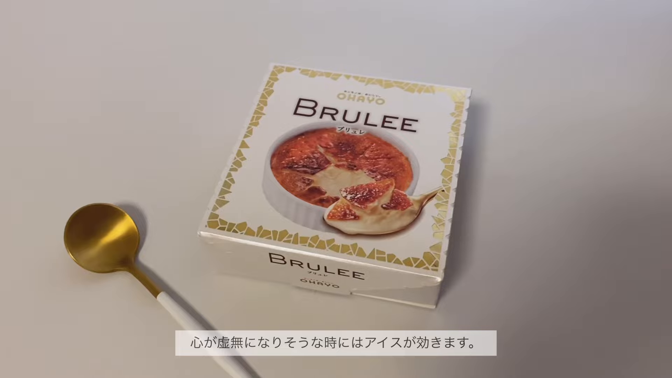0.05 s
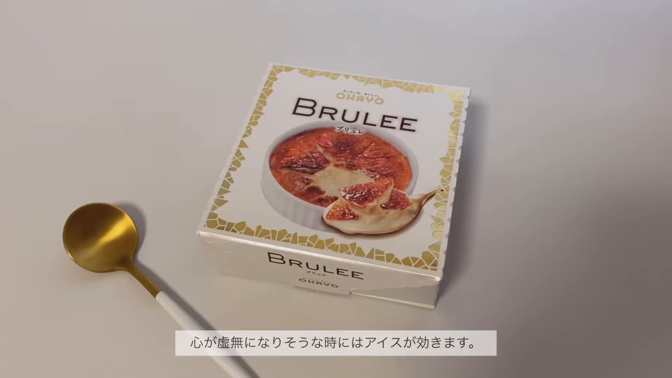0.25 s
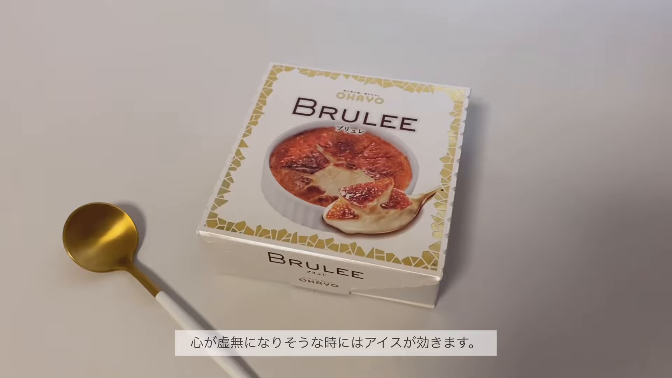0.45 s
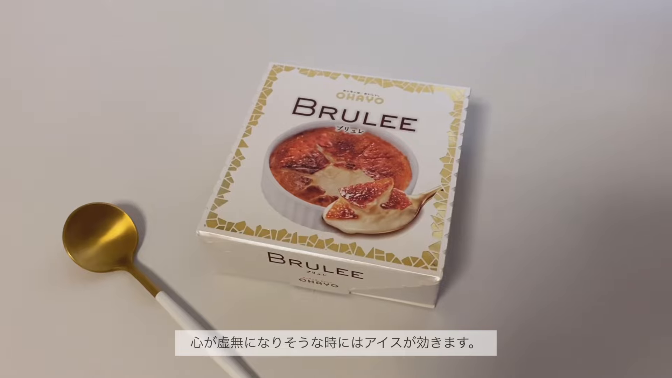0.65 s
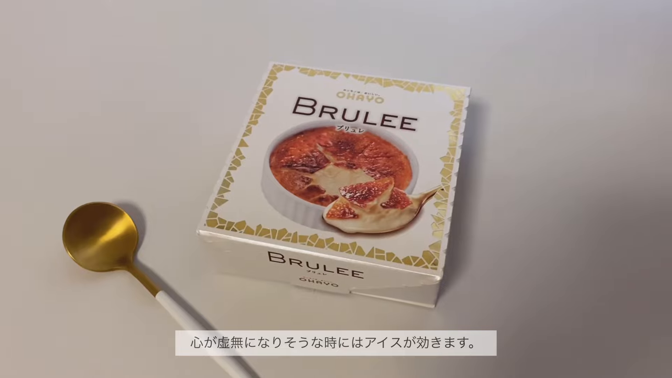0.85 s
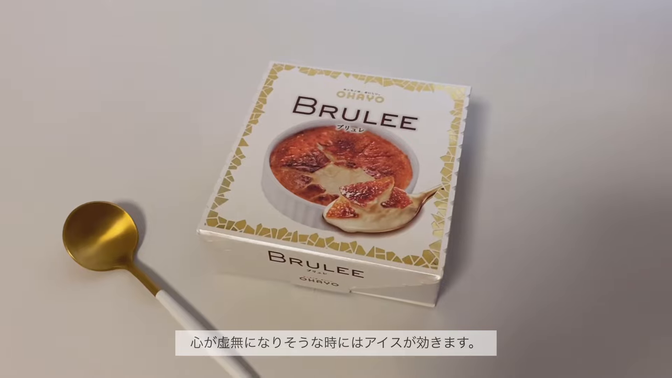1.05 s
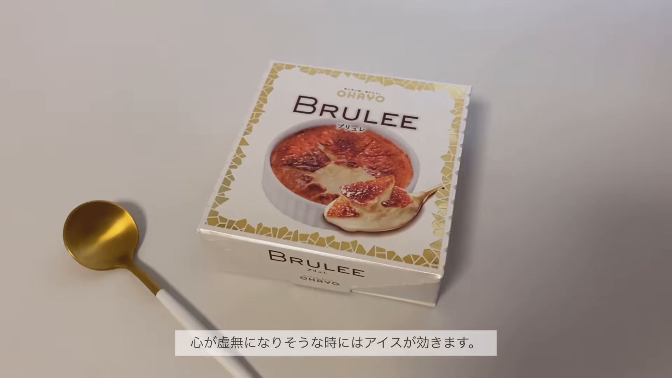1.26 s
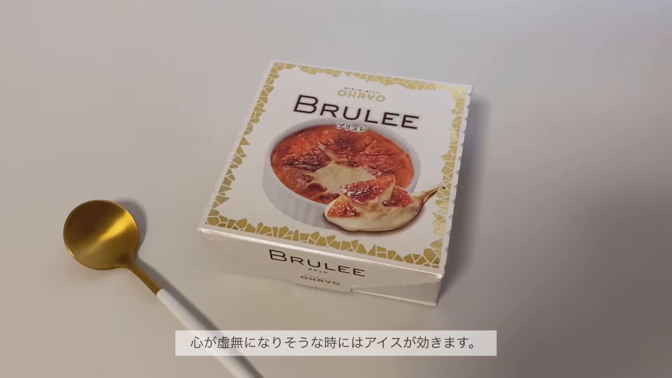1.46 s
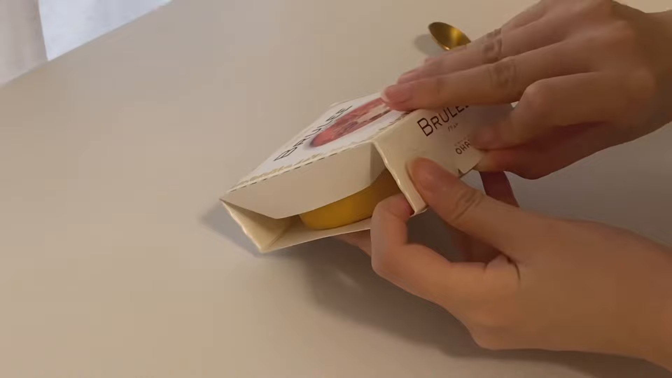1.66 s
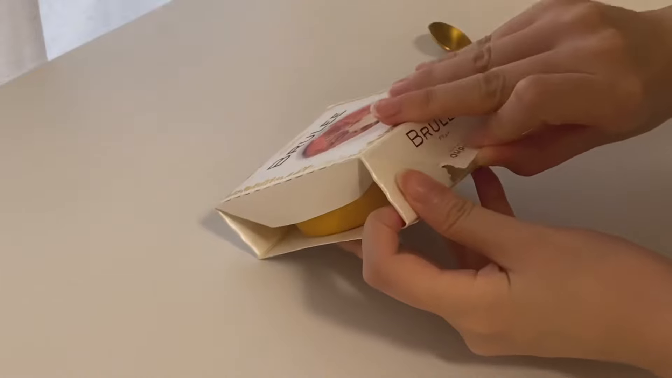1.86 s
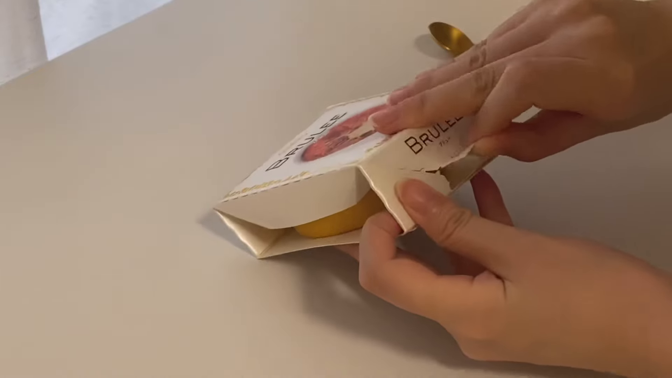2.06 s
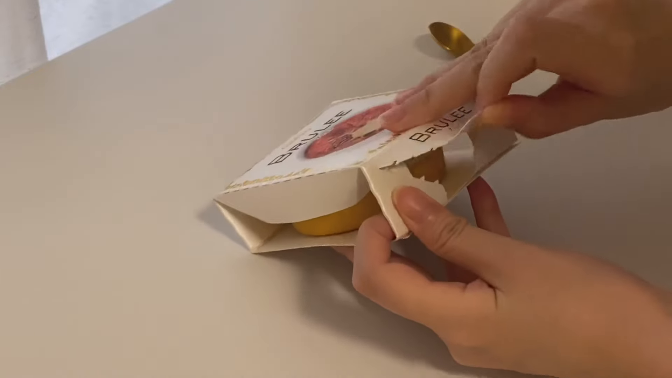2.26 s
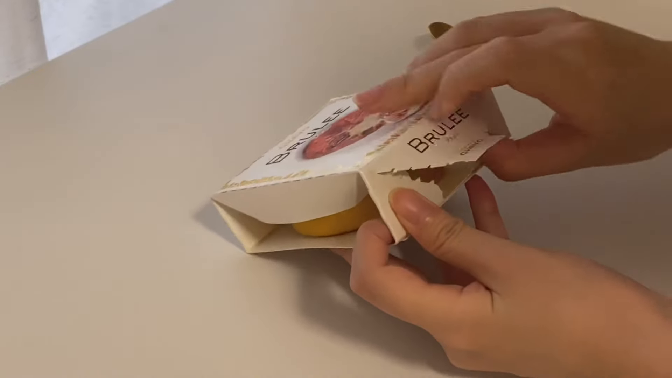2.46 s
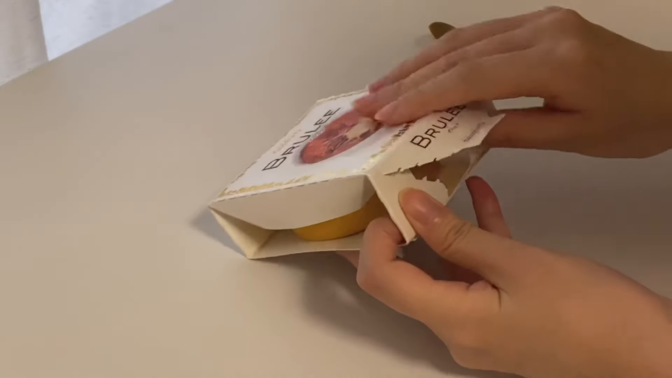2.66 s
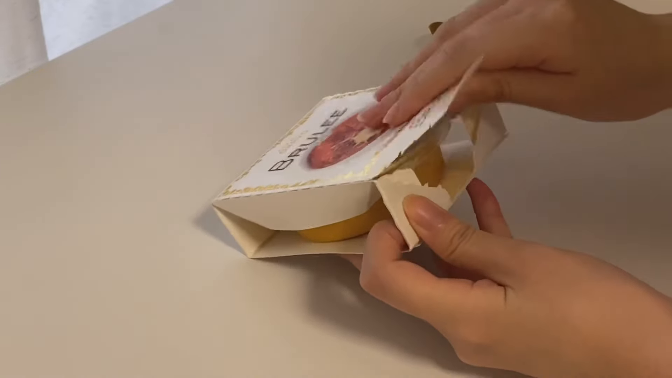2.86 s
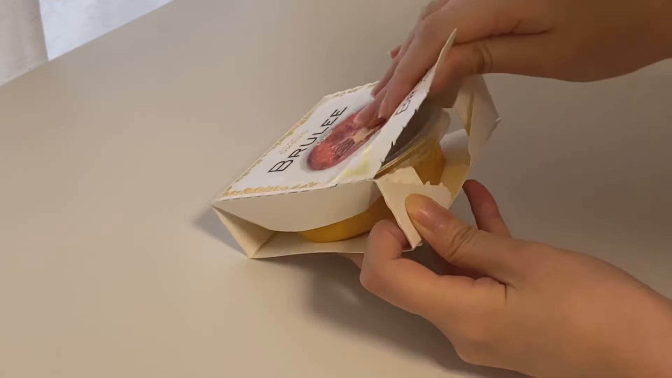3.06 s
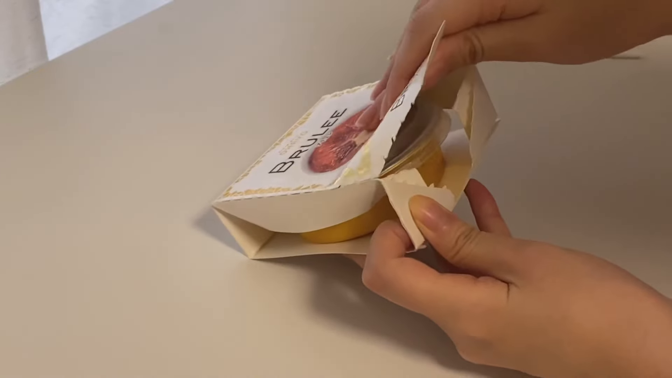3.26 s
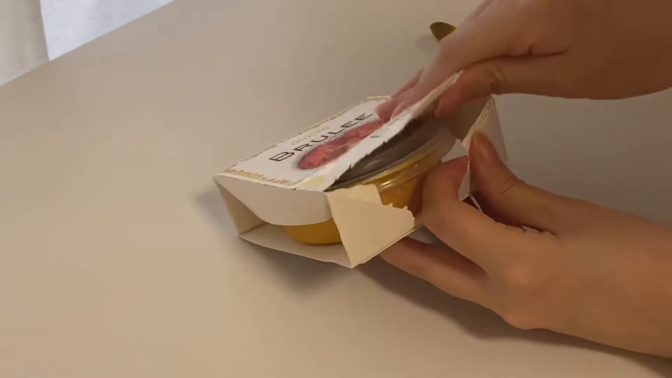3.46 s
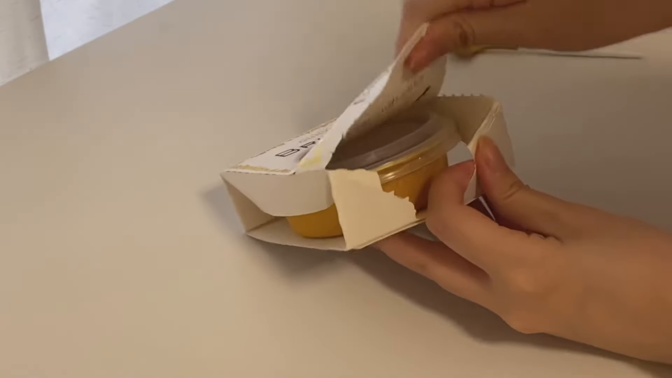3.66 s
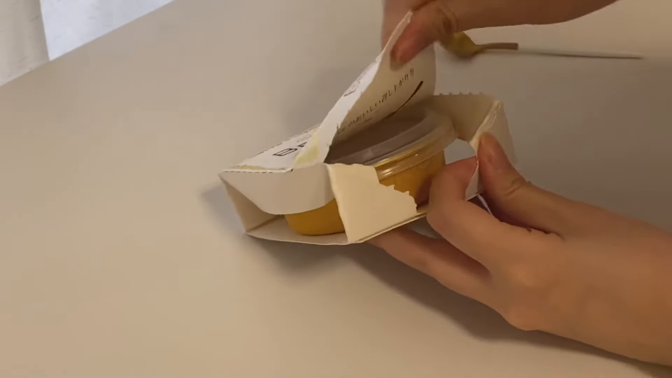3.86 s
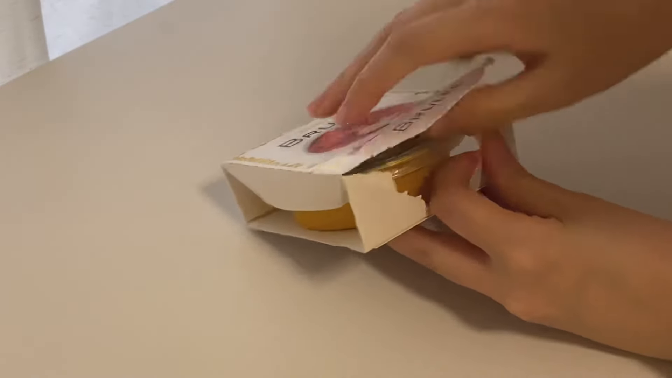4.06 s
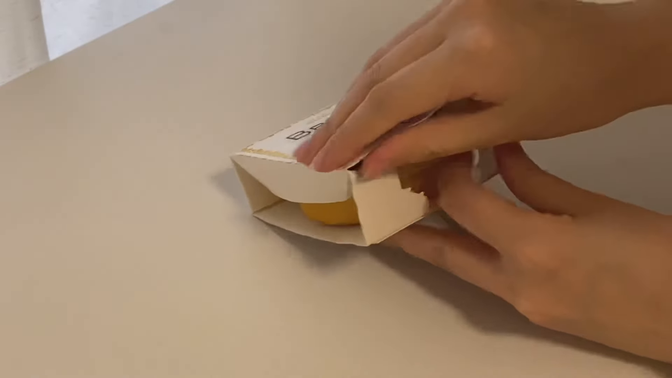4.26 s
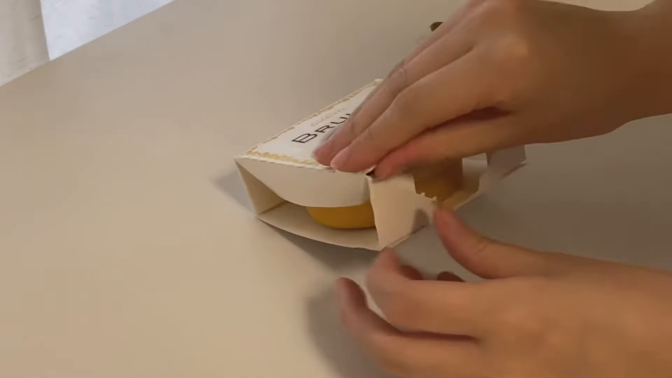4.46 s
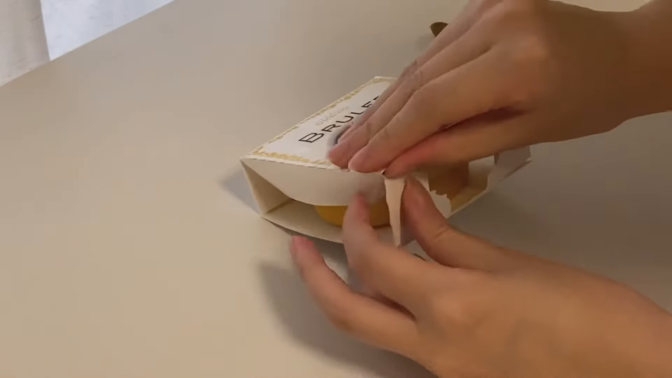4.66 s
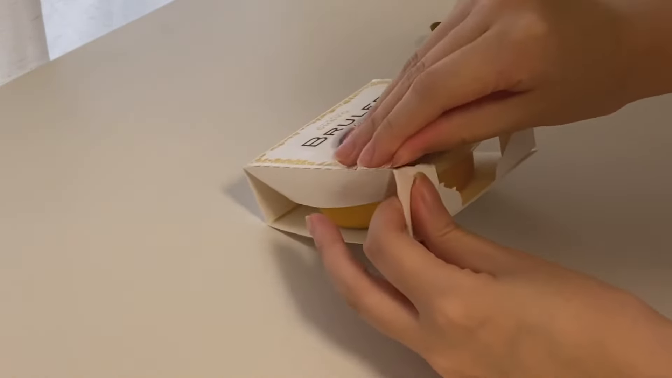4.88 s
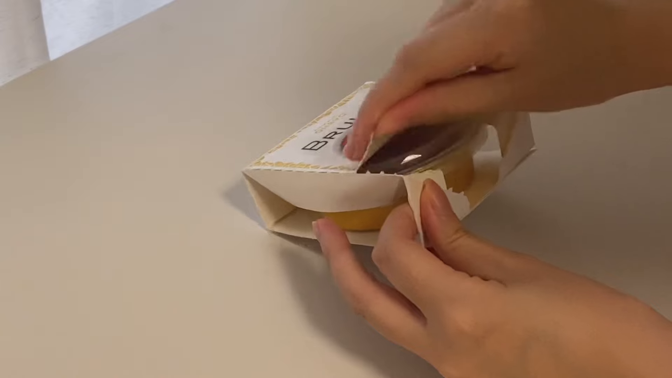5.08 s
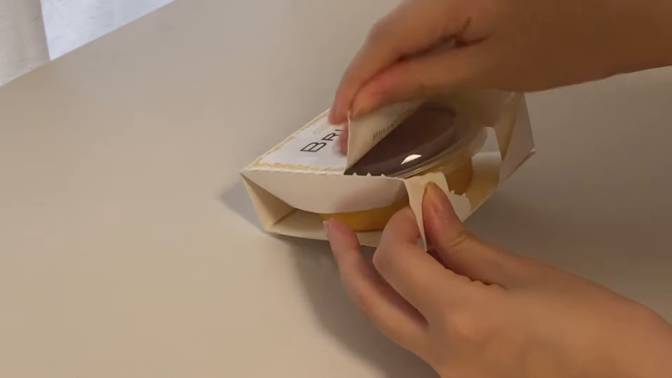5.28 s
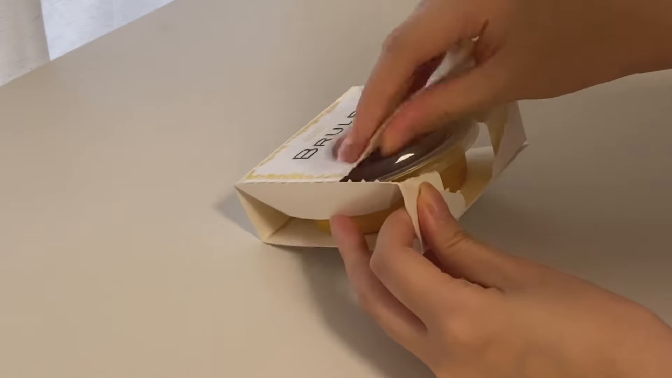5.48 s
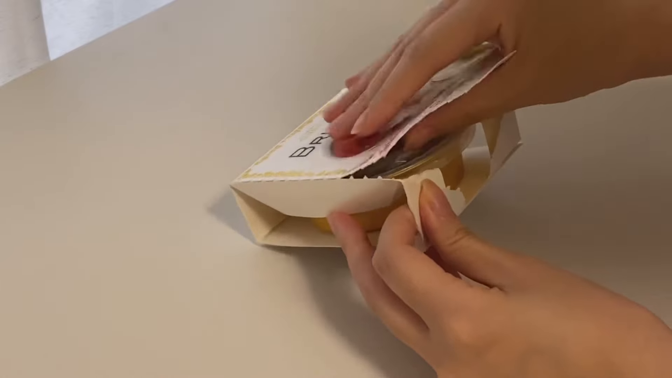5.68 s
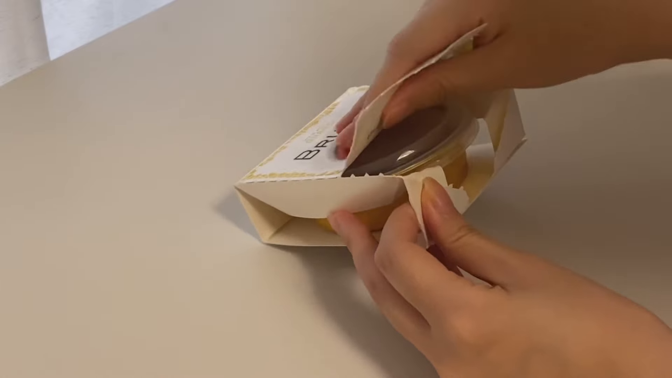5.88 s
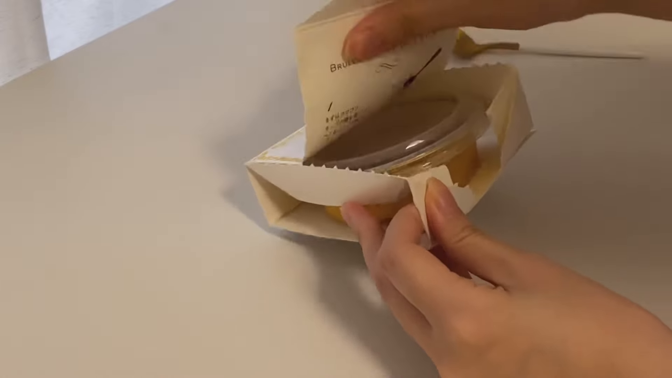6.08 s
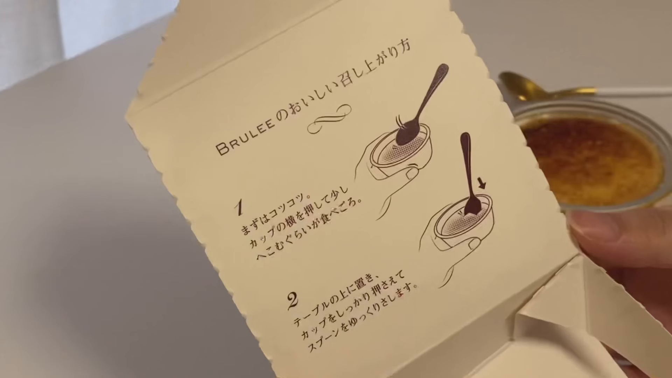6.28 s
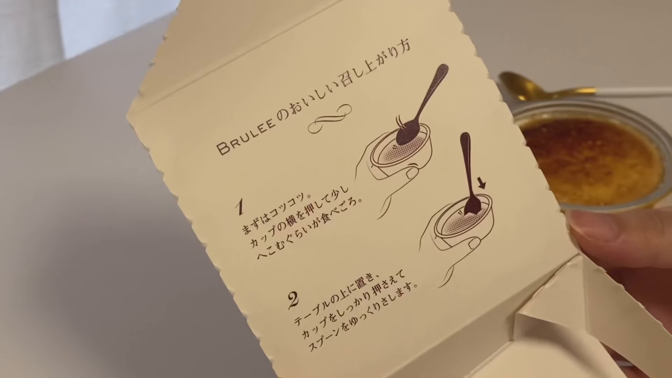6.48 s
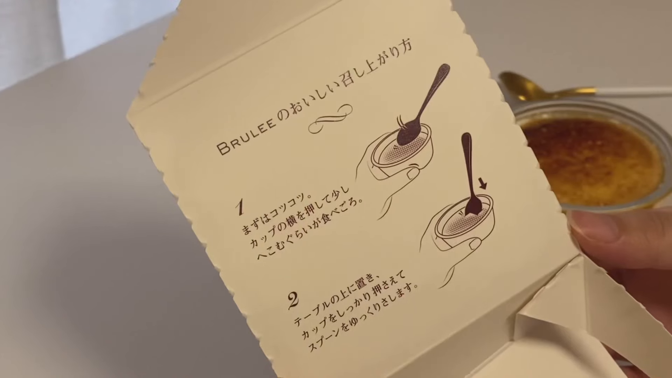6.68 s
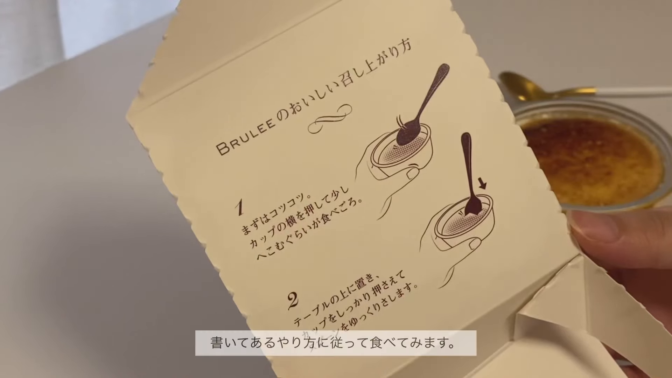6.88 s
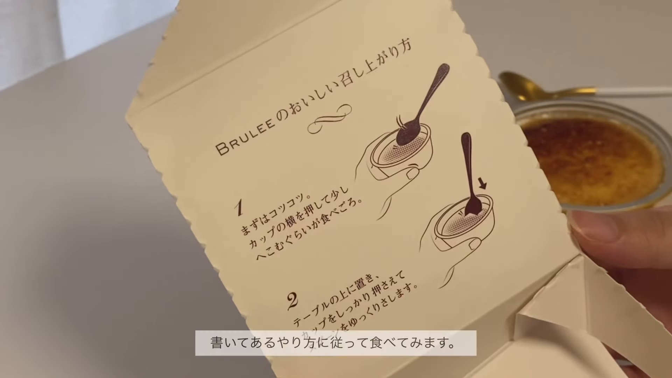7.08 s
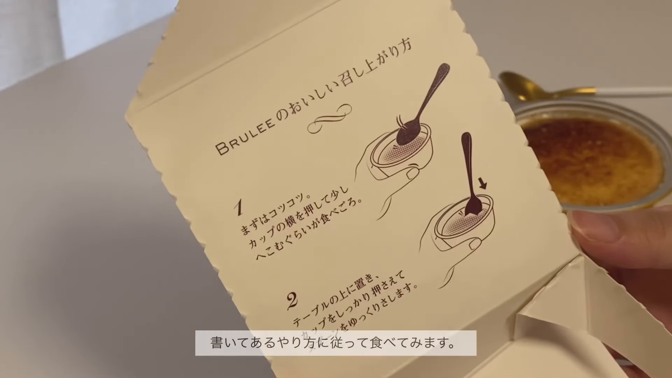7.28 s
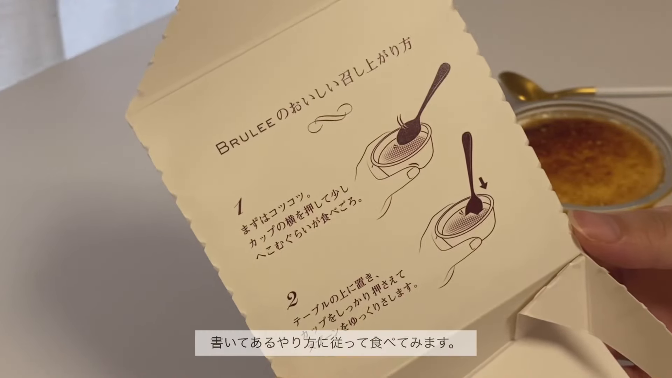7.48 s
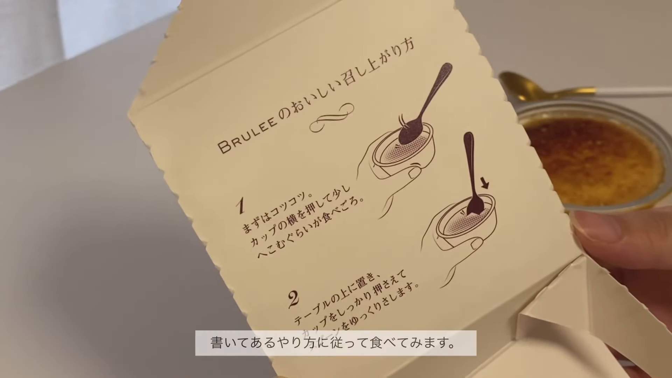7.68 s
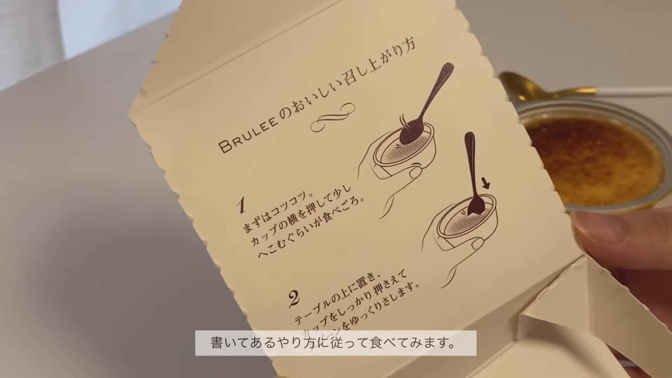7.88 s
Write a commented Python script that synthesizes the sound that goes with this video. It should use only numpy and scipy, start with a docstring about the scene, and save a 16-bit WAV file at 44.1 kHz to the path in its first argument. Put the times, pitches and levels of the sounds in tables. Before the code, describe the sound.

After a moment of quiet room air with a very faint appliance whine, hands tear a small paperboard box open along its perforation. The paper bridges give way in irregular clusters of dry snaps, some with a light hollow knock from the box. Fingers rub and slide softly on the board between tears. A last crackling burst leaves only quiet air. The microphone is close, at a table indoors.

```python
"""Quiet room air with a thin appliance whine. From 1.72 s hands tear a small paperboard box open
along its perforation, close by on a table. Each paper bridge creaks, snaps and rings the board,
the air inside and the table top. Fingers rub the board between tears over a low handling rumble;
the room answers briefly. From 6.22 s only quiet air of another colour is heard."""
import sys
import numpy as np
from scipy import signal
from scipy.fft import rfft, irfft, next_fast_len
from scipy.io import wavfile
from scipy.ndimage import uniform_filter1d

SR = 44100
rng = np.random.default_rng(int(sys.argv[2]) if len(sys.argv) > 2 else 0)


def int16_out(signal):
    """Quantize to a 16-bit WAV file."""
    q = np.round(np.clip(np.atleast_2d(signal).T, -1, 1) * 32767)
    wavfile.write(sys.argv[1], SR, q.astype(np.int16))


N = 350021
START_S, END_S = 1.72, 6.22  # box in hand
# hiss of skin and straining fibres: f/Hz, density/dB
HISS = [(1200, -25), (2000, -8.5), (3200, -10), (5000, -17), (7500, -16), (9500, -23.5), (15300, -24.5),
        (16000, -48.5)]


def gain_of(db):
    """Decibels to amplitude."""
    return 10 ** (np.asarray(db) / 20)


def unit_rms(x):
    """Scales x to rms 1."""
    return x / np.sqrt(np.mean(x ** 2) + 1e-20)


def lookup(points, hz):
    """Interpolates a table over log frequency."""
    f, value = np.transpose(points)
    return np.interp(np.log(hz + 1), np.log(f + 1), value)


def colour(x, points):
    """Filters x by a table of f/Hz, gain/dB."""
    size = next_fast_len(x.shape[-1])
    gain = gain_of(lookup(points, np.fft.rfftfreq(size, 1 / SR)))
    return irfft(rfft(x, size) * gain, size)[..., :x.shape[-1]]


def wander(rows, span_samples):
    """Smooth random curves, rms 1."""
    noise = rng.standard_normal((rows, N))
    return unit_rms(uniform_filter1d(uniform_filter1d(noise, span_samples), span_samples))


def add(mix, start_s, sound):
    """Adds sound to mix at start_s."""
    part = mix[round(start_s * SR):][:len(sound)]
    part += sound[:len(part)]


def tearing(strain_s=.012, knock_db_per_db=0.84):
    """Each bridge strains with a fast-growing creak, then snaps; the current grip sets the knock."""
    # bridges and creases: t/s, peak/dB, freed edge f/Hz, wall f/Hz, box ring/dB, fibre treble/dB
    snaps = [(1.844, -5.5, 1710, 1074, -9, -5.5), (1.862, -24, 2100, 1430, -22, -4),
             (1.957, -10.5, 2530, 1440, -15, -18.5), (2.086, -9, 2220, 805, -13, -12),
             (2.108, -7.5, 2840, 1540, -11.5, -7.5), (2.127, -4, 4600, 1590, -9, -11.5),
             (2.132, -10, 2380, 1060, -11, -17.5), (2.231, -11.5, 1670, 950, -11, -15),
             (2.24, -1.5, 2020, 1220, -14, -12), (2.249, -24, 2280, 640, 1, -33.5),
             (2.445, -34.5, 1670, 1130, -2, -14.5), (2.464, -37, 2150, 1100, 18, -17),
             (2.53, -40, 2900, 800, -2, -25.5), (2.625, -25.5, 1860, 980, 2.5, -21),
             (2.701, -7, 2580, 1140, -2, -6.5), (2.795, -15, 1870, 980, -3.5, -15),
             (2.798, -25, 2020, 934, 16, -43), (2.87, -14.5, 2220, 980, 0, -8),
             (2.883, -20.5, 2980, 1100, -3, -4), (2.893, -25.5, 2470, 1330, -8, -11),
             (3.025, -51, 3420, 1210, 2.5, -28.5), (3.215, -52, 1880, 738, -3.5, -33.5),
             (3.406, -25.5, 2080, 1143, -2, -8), (3.41, -31, 2040, 1220, -0.5, -23),
             (3.432, -3, 1920, 1026, -9.5, -20.5), (3.481, -2.5, 2080, 1220, -2.5, -11.5),
             (3.536, -4, 2260, 1210, -5.5, -14.5), (3.59, -8.5, 3120, 1280, 2.5, -5),
             (3.601, -18, 1890, 665, -8, -18), (3.635, -9, 1740, 837, -3, -12.5),
             (3.921, -36.5, 1960, 893, -19.5, -17.5), (3.931, -40.5, 3530, 1176, -6, -20),
             (3.947, -27.5, 2750, 1203, 12.5, 9), (4.047, -37.5, 4100, 1210, 10, 4),
             (4.226, -24.5, 2180, 1080, -12.5, -18), (4.334, -44, 1860, 1235, -7, -1),
             (4.446, -34.5, 2530, 1003, -6, -5.5), (4.581, -26, 2010, 970, -9.5, -13),
             (4.691, -30.5, 1900, 1250, -4, -18.5), (4.903, -44, 2640, 1050, -4, -19),
             (4.916, -21.5, 2640, 1125, -13.5, -13.5), (5.043, -5.5, 3100, 1480, -28.5, -11),
             (5.047, -6.5, 2810, 1410, -12.5, -20), (5.054, -6.5, 1770, 1180, -12.5, -15),
             (5.261, -5.5, 1565, 1120, -0.5, -11.5), (5.398, -48, 2064, 1043, -5.5, -33),
             (5.472, -38.5, 1621, 1018, -1, -15), (5.65, -36.5, 1740, 1110, -10.5, -39),
             (5.669, -41.5, 3700, 716, 4, -26), (5.787, -47.5, 1984, 700, -9, -23),
             (5.937, -4.5, 2730, 1154, -4, -19), (5.962, -1.5, 2390, 1080, -6, -14.5),
             (5.993, -8.5, 3340, 1110, 4, -6), (5.999, -12, 2170, 1240, -10, -19),
             (6.017, -5, 1996, 1101, -1, -8), (6.022, -15.5, 2290, 1272, -7, -31)]
    # grips on the box: from t/s, knock f/Hz, knock level for a 0 dB snap/dB
    grips = [(1.72, 350, -27.5), (2.6, 175, -31), (2.77, 320, -11), (2.876, 184, -3.5), (3.3, 290.3, -18.5),
             (3.57, 310.7, -11), (3.9, 248, -14.5), (4.4, 380, -25), (5.0, 275, -28), (5.15, 291, -13),
             (5.6, 160, -19), (5.9, 325, -19.5)]
    out = np.zeros(N)
    lead_s = np.arange(-strain_s, 0, 1 / SR)
    for at_s, peak_db, edge_hz, wall_hz, box_db, fibre_db in snaps:
        _, knock_hz, knock_db = [grip for grip in grips if grip[0] <= at_s][-1]
        knock_db -= (1 - knock_db_per_db) * peak_db  # weak snaps still jolt the box
        crack = board_crack(edge_hz, wall_hz, box_db, fibre_db)
        snap = box_jolt(knock_hz, knock_db, box_db)
        add(snap, 0, crack)
        add(out, at_s, gain_of(peak_db) * snap)
        creak = unit_rms(colour(rng.standard_normal(len(lead_s)), HISS))
        add(out, at_s - strain_s, gain_of(peak_db - 33.5) * np.exp(lead_s / 0.0019) * creak)
    return out


def board_crack(edge_hz, wall_hz, box_db, fibre_db):
    """Dense damped board modes start in turn: bending waves bring the treble first. Peak 1."""
    # walls and cavity: f/Hz, level/dB
    box_spectrum = [(450, -19), (620, -6), (760, -5.5), (900, -6.5), (1100, 3), (1300, -7), (1600, -10.5),
                    (2200, -39.5)]
    # breaking fibres: f/Hz, level/dB
    fibre_spectrum = [(1500, -33.5), (3000, 5.5), (5000, -2.5), (7500, -7.5), (9000, -10.5), (12000, -17),
                      (15300, -18), (16000, -36.5)]
    # board mode decay: f/Hz, t60/s
    damping = [(400, 0.006), (750, .03), (1300, 0.017), (3000, 0.013), (8000, 0.012), (16000, 0.012)]
    # a small sheet radiates little bass: f/Hz, gain/dB
    radiation = [(60, -40), (250, -22), (480, -4), (650, 0)]
    hz = np.geomspace(350, 16500, num=120)[:, None]
    detune, phase, scatter = rng.random((3, len(hz), 1))
    hz = hz * (1 + .03 * (detune - .5))
    parts_db = [-30 * np.log2(hz / edge_hz) ** 2,  # the freed edge flicks
                box_db + 11.0 - 70 * np.log2(hz / wall_hz) ** 2,  # the nearest wall rings most
                box_db + 7.5 + lookup(box_spectrum, hz),
                fibre_db + 4.5 + lookup(fibre_spectrum, hz)]
    power = sum(gain_of(db) ** 2 for db in parts_db)
    tau_s = lookup(damping, hz) / np.log(1000)
    amplitude = np.sqrt(power * hz / tau_s) * gain_of(4.5 * (scatter - .5))
    arrival_s = .07 / np.sqrt(hz) - 0.00049
    t = np.maximum(np.arange(1800) / SR - arrival_s, 0)
    envelope = (1 - np.exp(-t / (0.28 * tau_s))) ** 2 * np.exp(-t / tau_s)
    modes = amplitude * envelope * np.sin(2 * np.pi * (hz * t + 0.49 * phase))
    crack = colour(modes.sum(0), radiation)
    return crack / abs(crack).max()


def box_jolt(knock_hz, knock_db, box_db, lag_s=.003):
    """The heavy box follows a snap late: it jumps, the air inside rings, the table top thuds."""
    t = np.maximum(np.arange(4000) / SR - lag_s, 0)

    def mode(hz, db, t60_s, rise_s):
        return (1 - np.exp(-t / rise_s)) ** 2 * gain_of(db - 60 * t / t60_s) * np.sin(2 * np.pi * hz * t)

    knock = mode(knock_hz, knock_db, t60_s=0.036, rise_s=0.002)
    cavity_hz = 693.4 * rng.uniform(.94, 1.08)
    cavity = mode(cavity_hz, min(box_db, 0) - 13.5, t60_s=0.031, rise_s=0.0015)
    thud = mode(hz=167, db=-36, t60_s=.07, rise_s=0.0015)
    return knock + cavity + thud


def rubbing(grains_per_s=2500):
    """Clumped stick-slip grains shake the box walls; skin hisses along the coating."""
    # rubbed walls: f/Hz, density/dB
    rustle_spectrum = [(200, -25), (450, -8.5), (700, -2), (1000, 5), (1300, 0), (1700, -15.5),
                       (2500, -41.5)]
    rustle_drive, hiss_drive = finger_pressure()
    clumps = wander(3, span_samples=350)
    grains = gain_of(2.0 * np.minimum(rng.exponential(1, N), 5))
    grains *= (rng.random(N) < grains_per_s / SR) * rng.choice([-1, 1], N)
    rustle = unit_rms(colour(grains, rustle_spectrum)) * gain_of(2.8 * clumps[0])
    hiss = unit_rms(colour(0.91 * unit_rms(grains) + rng.standard_normal(N), HISS))
    thin_hiss = unit_rms(np.gradient(hiss))
    skin = 0.94 * hiss * gain_of(3.3 * clumps[1]) + 0.17 * thin_hiss * gain_of(2.1 * clumps[2])
    return rustle_drive * rustle + hiss_drive * skin


def finger_pressure(swell_s=0.036, die_s=.09, max_ramp_share=.4):
    """Drive of rustle and hiss: resting hands, plus strokes that swell, hold and die."""
    # fingers or a flap sliding on the board: t/s, length/s, rustle/dB, hiss/dB
    strokes = [(1.743, 0.24, -63, -81), (1.943, 0.018, -55, -49.5), (2.073, 0.037, -47.5, -45),
               (2.355, 0.38, -59.5, -61.5), (2.718, 0.31, -69, -66.5), (2.398, 0.009, -49.5, -58),
               (2.589, .012, -43.5, -80.5), (3.381, 0.02, -65.5, -59), (3.717, 0.33, -82.5, -83),
               (3.929, 0.041, -51, -49.5), (3.943, 0.4, -62.5, -62), (4.1, 0.024, -51.5, -60),
               (4.158, 0.074, -65, -70), (4.247, 0.046, -57.5, -49), (4.282, 0.32, -74.5, -77),
               (4.54, 0.037, -62.5, -61.5), (4.569, 0.31, -69.5, -76), (4.87, 0.22, -76.5, -78),
               (4.669, 0.036, -49, -47), (4.773, 0.055, -70, -64.5), (5.03, 0.029, -55, -47),
               (5.25, .24, -66, -73.5), (5.216, 0.057, -80, -53), (5.438, 0.3, -63.5, -60.5),
               (5.683, 0.22, -71, -70), (5.732, 0.049, -51.5, -61.5), (5.92, .02, -56, -53),
               (6.117, .14, -68.5, -66.5)]
    held = np.arange(N) / SR > START_S
    rustle_drive, hiss_drive = gain_of(-86.5) * held, gain_of(-87) * held
    for at_s, length_s, rustle_db, hiss_db in strokes:
        t = np.arange(0, length_s, 1 / SR)
        up_s, down_s = np.minimum([swell_s, die_s], max_ramp_share * length_s)
        ramp = np.minimum(t / up_s, (length_s - t) / down_s)
        stroke = np.sin(np.pi / 2 * np.minimum(ramp, 1)) ** 2
        add(rustle_drive, at_s, gain_of(rustle_db) * stroke)
        add(hiss_drive, at_s, gain_of(hiss_db) * stroke)
    return rustle_drive, hiss_drive


def room(x, drift_hz=3.1):
    """Hands and box keep moving, so the echoes drift among three patterns. Returns mid, side."""
    angle = 2 * np.pi * drift_hz * np.arange(N) / SR
    weights = [np.sqrt(2 / 3) * np.cos(angle + k * np.pi / 3) for k in range(3)]
    return sum(signal.fftconvolve((x * w)[None], echoes(), axes=1)[:, :N] for w in weights)


def echoes():
    """Mid and side tails of sparse random-sign echoes; each band dies at its own rate."""
    # room decay: f/Hz, t60/s
    decay = [(250, 0.46), (660, .22), (1200, 0.09), (2000, 0.27), (3000, 0.21), (6000, .19), (12000, 0.081)]
    # echo colour: f/Hz, level/dB
    tone = [(150, -14), (350, -9), (750, -6.5), (1200, -4.5), (2500, -4), (5000, -7), (12000, -0.5)]
    taps = np.zeros((2, SR // 2))
    at = np.arange(200, SR // 2 - 12, 12) + rng.integers(0, 12, (2, (SR // 2 - 201) // 12))
    np.put_along_axis(taps, at, rng.choice([-1., 1.], at.shape), 1)
    hz, t, bands = signal.stft(taps, SR, nperseg=128)
    early = 1 + gain_of(12.5 - 60 * t / 0.029)  # off table and hands
    fade = gain_of(lookup(tone, hz)[:, None] - 60 * t / lookup(decay, hz)[:, None])
    tail = signal.istft(bands * early * fade, SR, nperseg=128)[1]
    return tail / np.linalg.norm(tail[0])


def air(before_db=-58, after_db=-63.5):
    """Low rumble and faint hiss, coloured differently before, during and after the handling."""
    # air, one spectrum per stretch: f/Hz, density/dB
    spectra = [
        [(15, -25), (25, -17.5), (43, 0), (103, -1.5), (378, -22), (457, -19.5), (584, -36.5), (634, -30.5),
         (831, -40), (1120, -35), (1250, -43.5), (2210, -45), (16500, -61)],
        [(15, -36), (25, -0.5), (135, -0.5), (252, -13.5), (1150, -24), (1430, -23.5), (1880, -33),
         (7710, -47.5), (8830, -56), (11600, -45.5), (16500, -48.5)],
        [(15, -36), (25, -15), (65, -0.5), (100, -8), (142, -17), (214, -21), (600, -33), (831, -36.5),
         (1120, -41.5), (7300, -50.5), (16500, -61)],
    ]
    # left-right likeness of the air: f/Hz, coherence
    likeness = [(60, 1), (180, 0.89), (550, 0.88), (1650, 0.63), (4970, 0.88), (15000, 0.0066)]
    # rumble while the box is handled: t/s, level/dB
    handling = [(1.72, -61.5), (2.5, -61.5), (2.88, -54), (3.09, -66), (3.33, -66.5), (3.56, -46.5),
                (3.71, -63.5), (4.09, -60), (4.9, -68.5), (5.35, -67), (5.75, -61.5), (6.13, -57),
                (6.22, -63.5)]
    frames, hz = N // 512 + 5, np.fft.rfftfreq(2048, 1 / SR)
    a, b, c, d = rng.standard_normal((frames, 1025, 4)).T
    coherence = lookup(likeness, hz)[:, None]
    left = a + 1j * b
    right = coherence * left + np.sqrt(1 - coherence ** 2) * (c + 1j * d)
    noise = signal.istft(np.array([left, right]), nperseg=2048, noverlap=1536)[1][:, :N]
    t = np.arange(N) / SR
    stretch = np.searchsorted([START_S, END_S], t)
    levels_db = before_db, np.interp(t, *np.transpose(handling)), after_db
    return sum((stretch == k) * unit_rms(colour(noise, spectrum)) * gain_of(db)
               for k, (spectrum, db) in enumerate(zip(spectra, levels_db)))


def appliance_whine():
    """Three faint tones, wavering in level, until START_S."""
    # appliance tones: f/Hz, rms level/dB
    tones = [(624.5, -83), (1093, -100), (1141, -97)]
    t = np.arange(N) / SR
    whine = sum(np.sqrt(2) * gain_of(db) * np.sin(2 * np.pi * (hz * t + rng.random((2, 1))))
                for hz, db in tones)
    return whine * gain_of(wander(2, span_samples=3000)) * (t <= START_S)


def scene():
    """The box in front, its echoes, room air and whine."""
    # stereo side signal: f/Hz, gain/dB
    width = [(150, -18), (650, -8.5), (1300, -10.5), (2500, -22), (4000, -28), (7000, -33.5),
             (12000, -15.5)]
    # balance: f/Hz, left minus right/dB
    lean = [(130, -2), (300, -3), (450, -1), (700, 10.5), (1100, 1), (1600, -0.3), (4000, 0.34)]
    box = tearing() + rubbing()
    echo_mid, echo_side = room(box)
    far_walls = np.roll(box, 30)  # arrive 30 samples later
    mid = box + gain_of(-10.5) * echo_mid
    side = colour(gain_of(-2.5) * echo_side + far_walls, width)
    left = colour(mid + side, [(hz, db / 2) for hz, db in lean])
    right = colour(mid - side, [(hz, -db / 2) for hz, db in lean])
    return np.array([left, right]) * (np.arange(N) / SR < END_S) + air() + appliance_whine()


def record(dry, cutoff_hz=16900):
    """Turns the channels' phases apart in the treble, then low-passes."""
    # lead of the right channel: f/Hz, phase/rad
    phase_lead = (7100, 0), (15300, 4 * np.pi)
    size = next_fast_len(N + 512)
    lead_rad = np.interp(np.fft.rfftfreq(size, 1 / SR), *np.transpose(phase_lead))
    turned = irfft(rfft(dry, size) * np.exp(.5j * np.outer([-1, 1], lead_rad)), size)[:, :N]
    lowpass = signal.firwin(511, cutoff_hz, window=("kaiser", 9), fs=SR)
    return signal.oaconvolve(turned, lowpass[None], "same")


dry = scene()
out = record(dry)
int16_out(out)
```